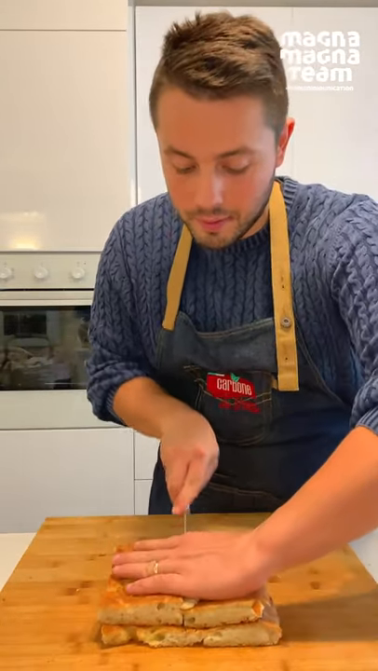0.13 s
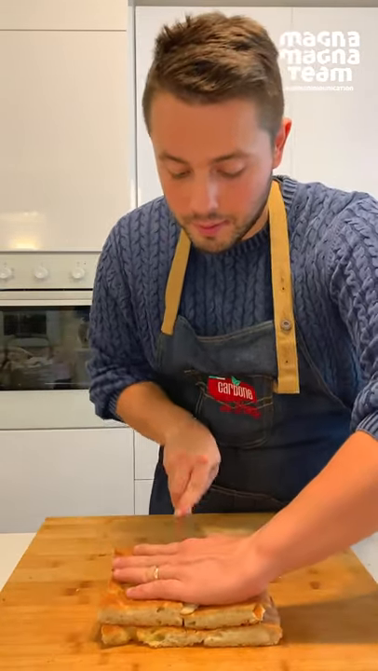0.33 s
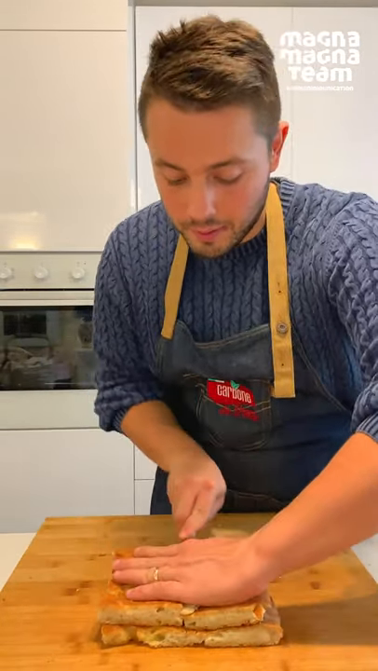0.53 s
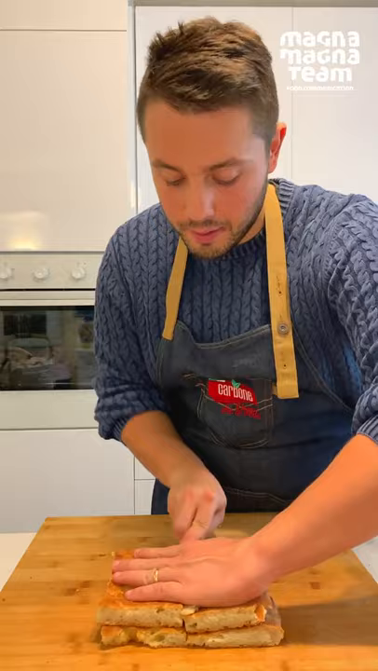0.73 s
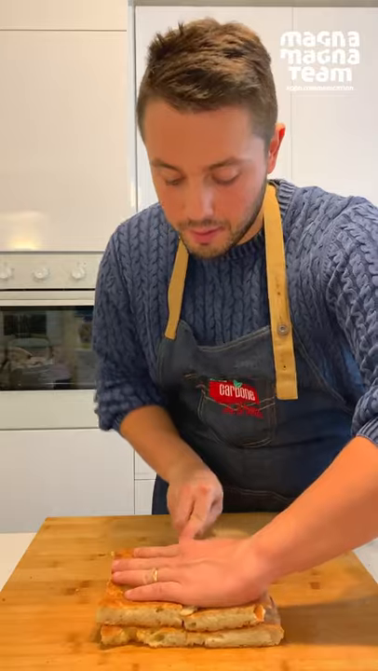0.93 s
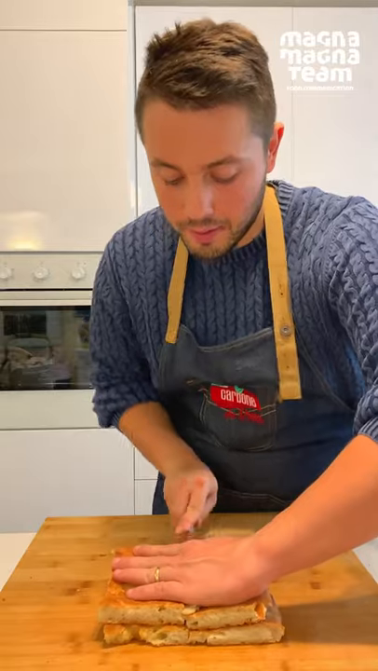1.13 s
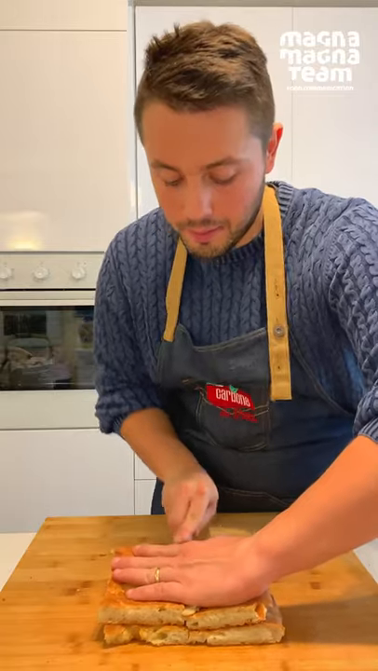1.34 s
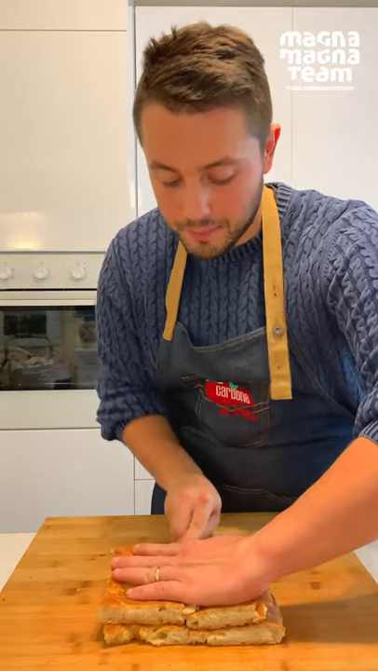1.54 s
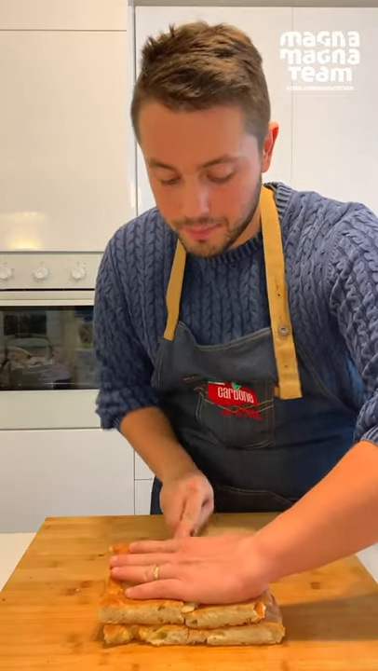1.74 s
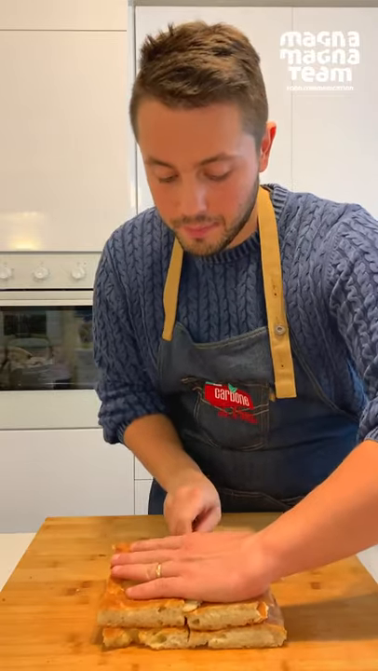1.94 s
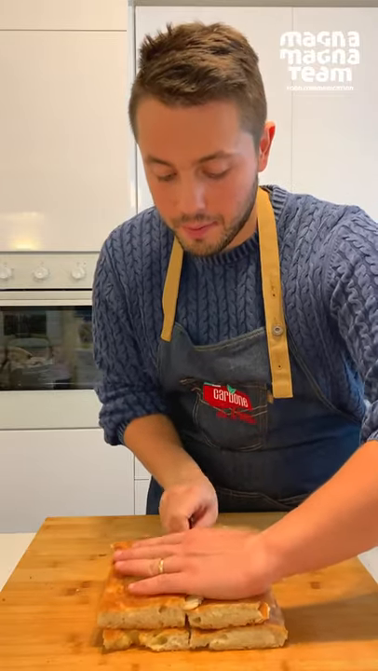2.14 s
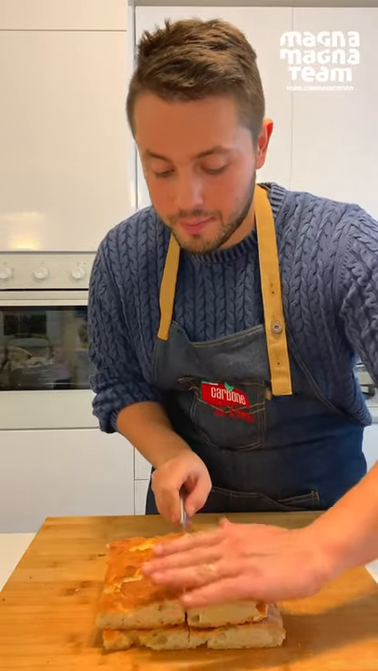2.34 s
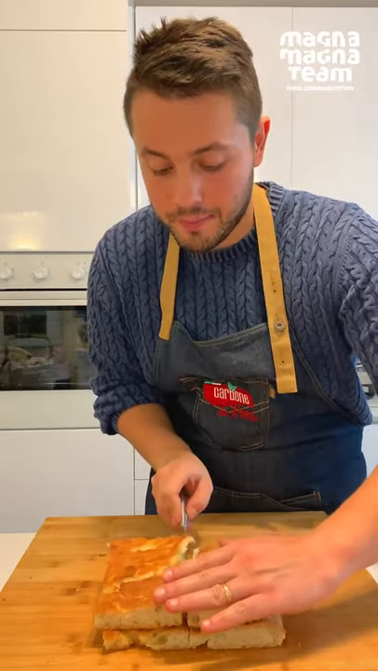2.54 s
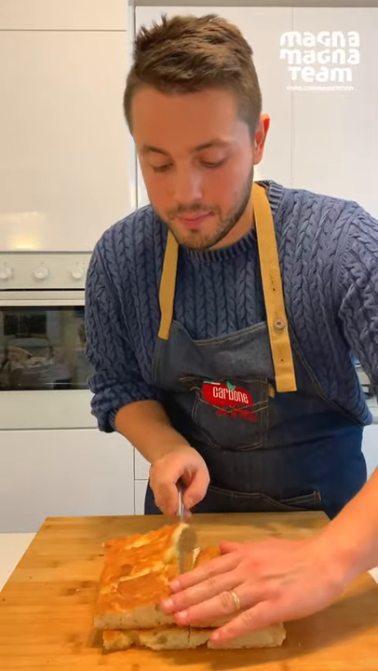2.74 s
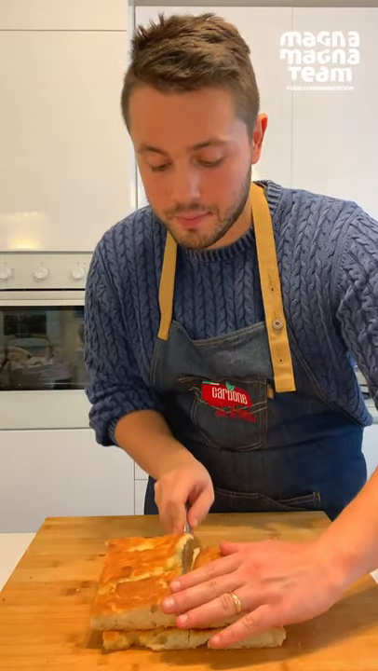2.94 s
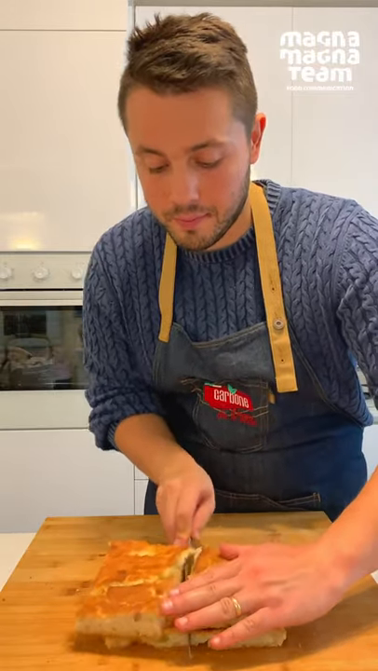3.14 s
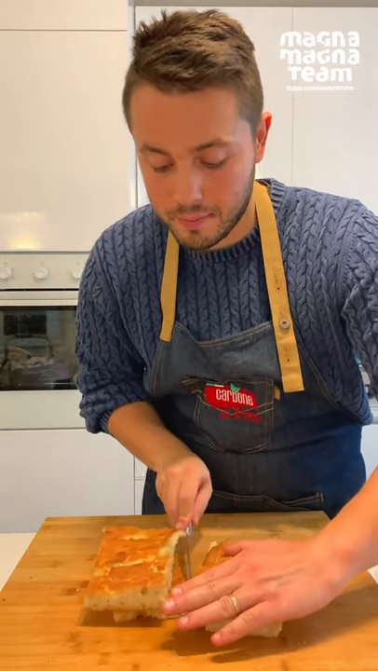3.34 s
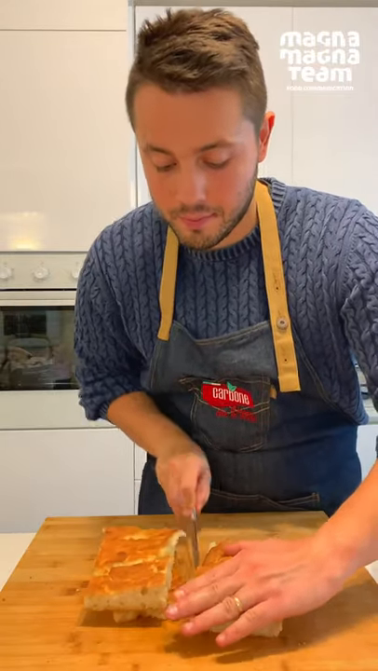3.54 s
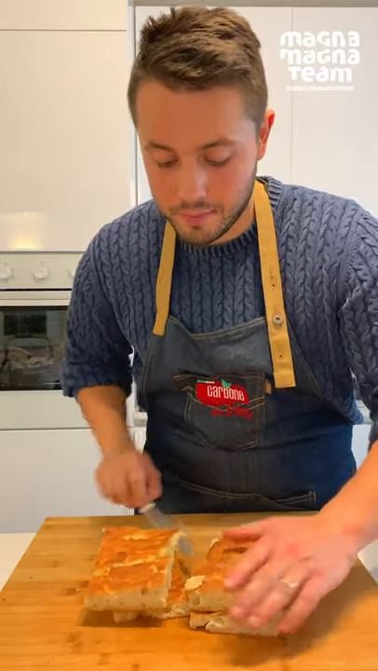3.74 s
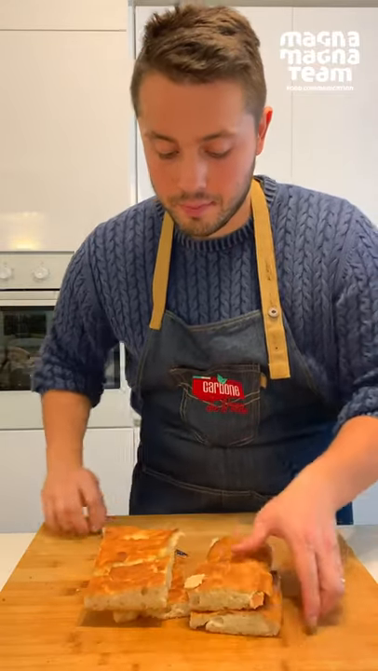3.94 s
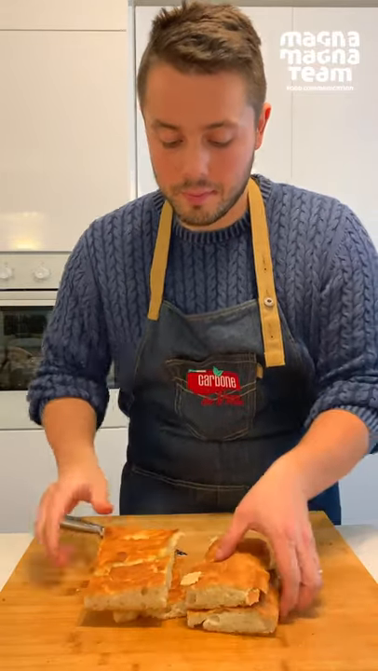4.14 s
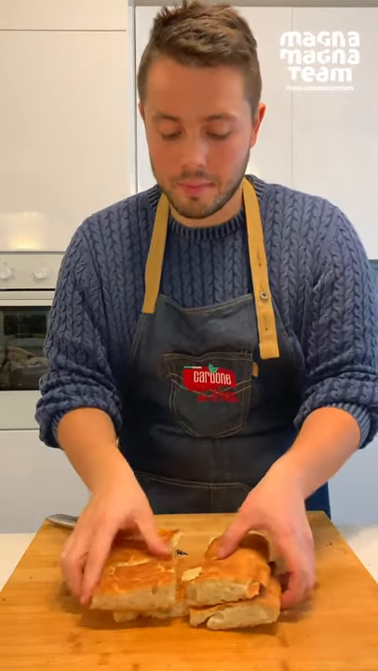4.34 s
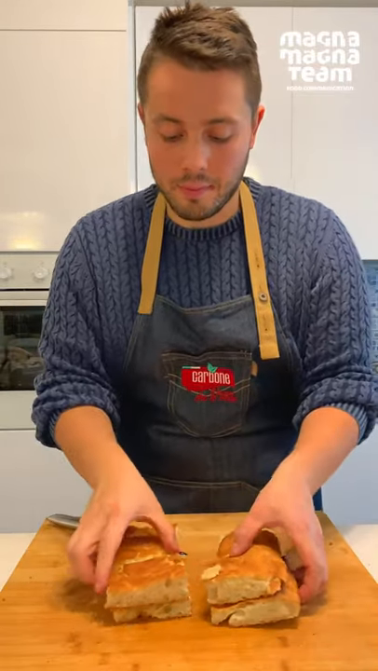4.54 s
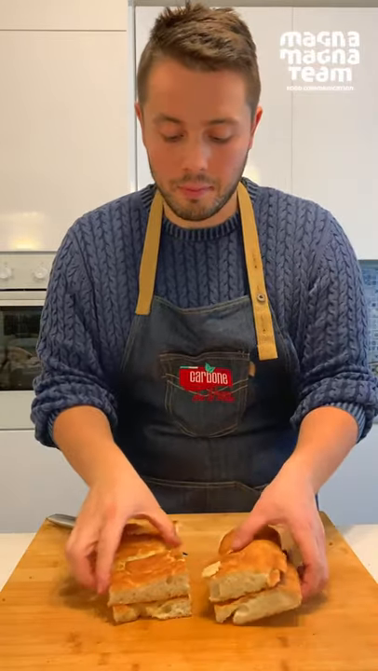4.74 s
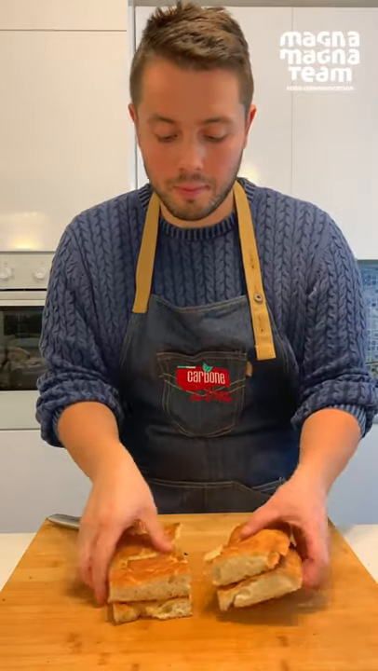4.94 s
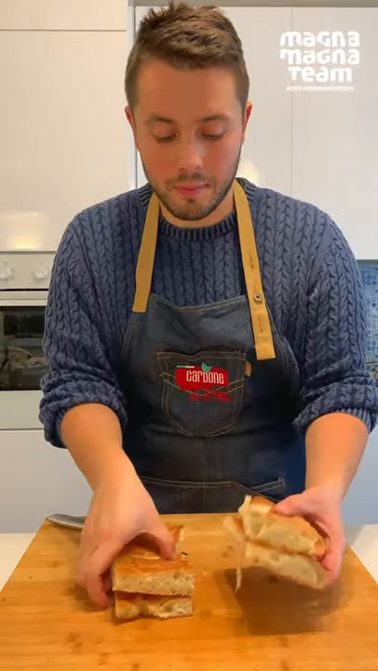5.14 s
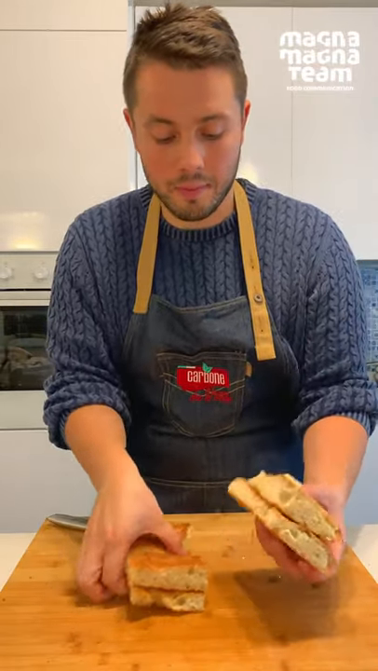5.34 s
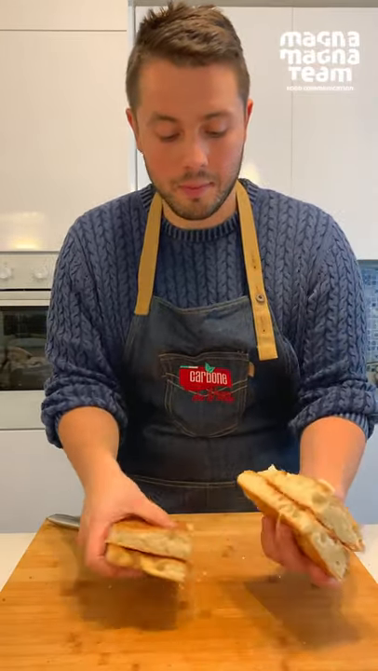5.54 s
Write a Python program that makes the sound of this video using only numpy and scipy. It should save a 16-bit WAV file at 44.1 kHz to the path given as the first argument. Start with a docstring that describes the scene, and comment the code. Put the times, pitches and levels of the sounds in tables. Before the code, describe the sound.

Close up in a kitchen, with a fan running softly, crisp bread crust crunches and crackles under a quickly sawing knife. The cutting pauses, then resumes with three slow strokes. The knife lands on the wooden board with a sharp knock and a brief metallic rattle, and dry crust rustles lightly as the pieces are lifted.

```python
"""Sawing crusty bread in a kitchen

A fan hums while a knife saws through a loaf on a wooden board: quick strokes, then three slow ones.
Each stroke breaks bits of crust that crackle, drum through loaf and board, and make the blade ring.
The blade clinks, then the knife drops on the board with a knock and rattles to rest.
Hands brush over the dry crust as they lift the pieces."""
import sys
import numpy as np
from scipy import signal
from scipy.fft import rfft, irfft
from scipy.io import wavfile

SR = 44100
rng = np.random.default_rng(int(sys.argv[2]) if len(sys.argv) > 2 else 0)


def store_wav(level_fs):
    """Save 16-bit WAV to argv[1]."""
    pcm = np.round(np.clip(np.atleast_2d(level_fs), -1, 1) * 32767)
    wavfile.write(sys.argv[1], SR, pcm.T.astype(np.int16))


N = 246078
TIME = np.arange(N) / SR
FREQS = np.maximum(np.arange(N // 2 + 1) * SR / N, 1)

# Levels in the tables are relative: each sound is turned up or down as a whole later.
# How alike left and right are for close sounds. Each row: pitch in Hz, likeness from 0 to 1.
NEAR_LIKENESS = [(100, 1), (600, 0.87), (1200, 1), (2600, 0.24), (5000, 0.11), (10000, 0.042)]
# The same for the fan and the room's echo. Each row: pitch in Hz, likeness from 0 to 1.
FAR_LIKENESS = [(60, 0.71), (130, 0.74), (270, 0.99), (580, 0.46), (1200, 0.16), (2600, 0.1), (5500, 0.046)]
# Weight leaning on the knife. Each row: time in seconds, level in dB.
LEANING = [(0, -50.5), (.5, -51.5), (1.05, -45.5), (1.5, -54), (1.8, -50), (2.15, -73), (2.45, -75)]
# The tone of something brushing the crust. Each row: pitch in Hz, level in dB.
BRUSH_TONE = [(600, -11.5), (1200, 11), (2200, 9), (3200, 4), (4700, 3), (5400, 5.5), (6500, 3),
              (8000, 0.5), (10500, -1), (12000, -28)]
# The knife hitting the board. Each row: time in seconds, board level in dB, blade level in dB,
# blade brightness in dB per octave, seconds a 1000 Hz wave travels in the board, chatter level in dB.
BLOWS = [(3.8115, -31, -41.5, 6, 0.0012, -62), (3.8367, -38, -32, -2, 0.00055, -29),
         (3.9055, -28, -56, 0.5, 0.00067, -53.5), (3.9325, -26, -37.5, -3, 0.00039, -51),
         (3.9424, 3.5, -42.5, 0, 0.0039, -37.5), (3.952, -19.5, -37, 11.5, 0.00112, -27.5),
         (3.9720, -32.5, -44, 7.5, 0.0016, -24.5), (3.9821, -5, -49.5, 14, .0007, -21),
         (3.9965, -28.5, -36.5, 11, .001, -28.5)]


def amp(db):
    """Turn decibels into a number to multiply by."""
    return 10 ** (np.asarray(db) / 20)


def unit(x, axis=None):
    """Scale a signal so that its average power is 1."""
    return x / np.sqrt(np.mean(np.abs(x) ** 2, axis=axis, keepdims=True) + 1e-20)


def level(rows):
    """Strength over time, from rows of seconds and dB."""
    return amp(np.interp(TIME, *np.transpose(rows)))


def at_hz(points, hz):
    """Read a table between its pitches, giving each octave equal room."""
    pitches, values = np.transpose(points)
    return np.interp(np.log(hz), np.log(pitches), values)


def response(tone):
    """Turn a tone table into a filter that rings only after it is struck (minimum phase)."""
    cepstrum = irfft(np.log(unit(amp(at_hz(tone, FREQS)))), N)
    cepstrum[1:N // 2] *= 2
    cepstrum[N // 2 + 1:] = 0
    return np.exp(rfft(cepstrum))


def colour(x, tone):
    """Filter a signal to give it the tone in a table."""
    return irfft(rfft(x) * response(tone), N)


def blend(pair, likeness):
    """Mix two unrelated signals into left and right, alike in the bass and apart in the treble."""
    alike = np.clip(at_hz(likeness, FREQS), 0, 1)
    mid, side = rfft(pair)
    return irfft(np.sqrt((1 + alike) / 2) * mid + np.sqrt((1 - alike) / 2) * side * [[1], [-1]], N)


def drift(per_s):
    """A line that wanders at random around zero."""
    points = rng.standard_normal(int(N / SR * per_s) + 2)
    return unit(np.interp(TIME * per_s, np.arange(len(points)), points))


def grains(per_s, spread_db):
    """Tiny random clicks of uneven size, each shared differently between two channels."""
    clicks = rng.random(N) < per_s / SR
    size = amp(spread_db * np.minimum(rng.exponential(1, N), 4))
    angle = rng.uniform(0, 2 * np.pi, N)
    return unit(clicks * size * np.array([np.cos(angle), np.sin(angle)]))


def swell(start, end, skew=0.82, sharpness=1.6):
    """The force of one hand movement, from 0 to 1: it grows quickly and eases off."""
    progress = np.clip((TIME - start) / (end - start), 0, 1)
    return np.abs(np.sin(np.pi * progress ** skew)) ** sharpness


def held(start_s, rise_s, length_s, fade_s):
    """Rise, hold until the length is over, then die away."""
    rise = np.clip((TIME - start_s) / rise_s, 0, 1)
    return rise * np.exp(-np.clip((TIME - start_s - length_s) / fade_s, 0, 40))


def fan():
    """A fan makes a steady rush of air and a low hum."""
    # The tone of the moving air. Each row: pitch in Hz, level in dB.
    air_tone = [(25, -27), (45, -7), (65, -13.5), (95, -17), (125, -4.5), (180, -1.5), (245, -5.5),
                (360, -0.5), (520, -3.5), (700, -7), (900, -3.5), (1200, -11.5), (2100, -18.5),
                (3000, -50.5), (10500, -51), (12000, -68)]
    # The notes of the hum. Each row: pitch in Hz, level in dB.
    hum_notes = [(61.5, -69), (100.2, -61.5)]
    air = blend(colour(rng.standard_normal((2, N)), air_tone), FAR_LIKENESS)
    hum = sum(amp(db) * np.sqrt(2) * np.sin(2 * np.pi * (hz * TIME + rng.random()))
              for hz, db in hum_notes)
    return amp(-54.1) * air + hum


def sawing():
    """The edge catches and slips: big breaks drum through the loaf, fine ones crackle and ring steel."""
    # Saw strokes. Each row: start in seconds, end in seconds, rasp level in dB, crackle level in dB.
    strokes = [(0.101, 0.203, -43.5, -49.5), (0.272, 0.339, -41.5, -49), (0.393, 0.484, -39.5, -43.5),
               (0.535, 0.612, -39, -51), (0.627, 0.754, -39, -49), (0.767, 0.881, -30, -50),
               (0.878, 0.994, -32, -45.5), (1.023, 1.163, -35.5, -53), (1.16, 1.291, -42.5, -53),
               (1.302, 1.421, -34.5, -42), (1.4, 1.525, -33, -41.5), (1.527, 1.672, -35.5, -43),
               (1.633, 1.84, -42.5, -52.5), (2.951, 3.084, -50, -65), (3.051, 3.387, -43, -50.5),
               (3.408, 3.579, -44, -54)]
    # The tone of coarse crust breaking. Each row: pitch in Hz, level in dB.
    rasp_tone = [(60, -28.5), (150, -24.5), (250, -6.5), (350, -0.5), (500, 7), (750, 1), (1100, 3),
                 (1400, -9.5), (1700, -4), (2200, -15.5), (2900, -47), (4500, -42)]
    # The tone of fine crust breaking. Each row: pitch in Hz, level in dB.
    crackle_tone = [(500, 5.5), (1200, 1.5), (1900, -0.5), (2500, 21.5), (3100, -25), (4100, 9), (4750, 5),
                    (5400, 8.5), (6400, 15), (7600, 11), (8850, 17), (9700, 14), (10600, 5.5),
                    (12000, -49.5)]
    # The low tone of the loaf rocking. Each row: pitch in Hz, level in dB.
    rumble_tone = [(20, -32.5), (45, -4), (70, 2), (112, 1), (150, -6.5), (220, 1), (400, -8),
                   (1000, -50.5)]
    rasp, crackle = sum(amp([[rasp_db], [crackle_db]]) * swell(start, end)
                        for start, end, rasp_db, crackle_db in strokes)
    catching = unit(amp(1.3 * drift(per_s=220)))
    lean = level(LEANING)
    drag = catching * np.hypot(rasp, amp(-7.5) * lean)  # the weight keeps it grinding between strokes
    coarse = grains(per_s=900, spread_db=2) * drag
    fine = grains(per_s=6000, spread_db=1.5) * catching * crackle
    crunch = amp(-4) * colour(coarse, rasp_tone)
    hollow = amp(15) * loaf(grains(per_s=1800, spread_db=1.2) * drag)
    scrape = amp(6.5) * teeth(fine)
    crisp = amp(2) * colour(fine, crackle_tone)
    push = lean + amp(-23.5) * rasp + amp(1) * touch_force()
    rocking = amp(-6.5) * colour(grains(per_s=130, spread_db=4) * push, rumble_tone)
    return blend(crunch + hollow + crisp + scrape + rocking, NEAR_LIKENESS)


def resonance(x, hz, width):
    """Let a signal ring at one pitch; a smaller width in Hz rings longer."""
    r = np.exp(-np.pi * width / SR)
    feed = np.array([1, 0, -1]) * (1 - r * r) / 2
    feedback = [1, -2 * r * np.cos(2 * np.pi * hz / SR), r * r]
    return signal.lfilter(feed, feedback, x + 1e-18)


def loaf(breaks):
    """Loaf and board ring with a hollow sound that changes as the blade sinks in."""
    # How far the blade is in the loaf. Each row: time in seconds, depth from 0 to 1.
    blade_depth = [(0, 0), (1.2, .05), (1.36, .8), (3.1, 1)]
    # The notes of loaf, board and wedged blade. Each row: pitch in Hz, width in Hz,
    # level in dB with the blade at the surface, level in dB with it deep in the cut.
    notes = [(121.5, 11, 0.5, -10), (164, 26, -6, -12), (239.5, 9.7, 1, 0.5), (342, 17, 3, -17),
             (411.6, 20, -8, 4), (519.4, 30, 3.5, 1), (559.4, 60, -7, 0), (665.4, 33, 9.5, -1.5),
             (759, 47, 3, -1), (893, 130, -1, -7), (1004, 80, -7.5, 5), (1215, 58, -2, -20.5),
             (1387, 90, -14, -6), (1665, 320, -19, -8.5), (1953, 73, -32.5, -3), (2530, 160, -22.5, -20.5)]
    depth = np.interp(TIME, *np.transpose(blade_depth))
    # The soft inside of the loaf swallows the treble.
    muffled = signal.sosfilt(signal.butter(2, 2840, fs=SR, output="sos"), breaks + 1e-18)
    surface, deep = muffled * (1 - depth), muffled * depth
    return sum(resonance(surface * amp(top_db) + deep * amp(deep_db), hz, width)
               for hz, width, top_db, deep_db in notes)


def teeth(friction):
    """The blade gives a thin ring as its teeth scrape."""
    # The notes of the scraped blade. Each row: pitch in Hz, width in Hz, level in dB.
    notes = [(3580, 90, -6), (4380, 150, -1), (5040, 160, 1), (5500, 200, -3), (6450, 350, 1),
             (7050, 200, -1), (8520, 220, 0), (9340, 400, -2)]
    return sum(resonance(friction, hz, width) * amp(db) for hz, width, db in notes)


def touch_force():
    """How hard the hands touch the bread over time."""
    # Hands brushing and lifting. Each row: start in seconds, end in seconds, level in dB.
    touches = [(2.122, 2.203, -72), (2.206, 2.33, -75), (3.56, 3.704, -72.5), (4.47, 4.58, -70),
               (4.851, 4.975, -72.5), (5.04, 5.157, -76), (5.184, 5.33, -65.5), (5.347, 5.48, -66.5),
               (5.466, 5.575, -68)]
    return sum(amp(db) * swell(start, end) for start, end, db in touches)


def handling(grasp_s=3.8):
    """Dry crust rustles as it is leaned on, brushed by fingers and finally held."""
    force = touch_force() + amp(-6.5) * level(LEANING) + amp(-78.5) * (TIME > grasp_s)
    rustle = grains(per_s=2500, spread_db=2.2) * force
    return amp(3) * blend(colour(rustle, BRUSH_TONE), NEAR_LIKENESS)


def snaps_and_knocks(spray_s=0.0058, spray_db=-19.5):
    """Crust snaps, or bread or blade knocks: each is one click and a short spray of tiny ones."""
    # Crust snaps, plus a few soft knocks and thuds of bread and blade.
    # Each row: time in seconds, level in dB.
    hits = [(0.0835, -31), (0.1336, -44), (0.1765, -16.5), (0.2915, -22.5), (0.411, -23), (0.644, -29),
            (0.711, -21.5), (0.782, -21), (0.8955, -12), (1.5955, -17), (2.182, -38.5), (2.25, -36.5),
            (3.0295, -23.5), (3.0395, -43), (5.263, -27)]
    # The tone they all share. Each row: pitch in Hz, level in dB.
    hit_tone = [(100, -54.5), (400, -17), (800, 18), (1500, 8.5), (2300, 2), (3300, -8.5), (6500, -6),
                (11000, -18.5)]
    clicks, spray_level = np.zeros(N), np.zeros(N)
    for start, db in hits:
        at = round(start * SR)
        clicks[at] = amp(db)
        spray_level[at:] += amp(db + spray_db) * np.exp(-TIME[:N - at] / spray_s)
    spray = blend(spray_level * grains(per_s=4000, spread_db=1), NEAR_LIKENESS)
    return amp(5) * colour(clicks + spray, hit_tone)


def sliding():
    """The flat of the blade slides along the cut bread with a thin scrape."""
    # Slides in or out of the cut. Each row: start in seconds, length in seconds, level in dB.
    slides = [(1.885, 0.017, -47.5), (2.196, 0.056, -67.5), (2.909, 0.072, -58), (3.685, 0.063, -68.5),
              (3.748, 0.15, -57.5)]
    force = sum(amp(db) * held(start, rise_s=0.049, length_s=length, fade_s=0.025)
                for start, length, db in slides)
    friction = grains(per_s=6000, spread_db=1.5) * force
    return blend(amp(7) * teeth(friction) + colour(friction, BRUSH_TONE), NEAR_LIKENESS)


def board():
    """Each blow bends the board, and waves cross it with the highs ahead of the lows."""
    # The tone of knocked wood. Each row: pitch in Hz, level in dB.
    knock_tone = [(50, -29.5), (150, -4.5), (330, -3.5), (480, 2), (700, -17.5), (1000, 0), (1500, 9),
                  (2000, 6), (2700, 2.5), (3600, -22.5), (6000, -18.5), (11000, -43.5)]
    spectrum = 0
    for start, board_db, _, _, travel_s, _ in BLOWS:
        lag_cycles = FREQS * start + 2 * travel_s * np.sqrt(FREQS * 1000)
        spectrum = spectrum + amp(board_db) * np.exp(-2j * np.pi * lag_cycles)
    return amp(6.5) * irfft(spectrum * response(knock_tone), N) * np.ones((2, 1))


def blade(let_go_s=3.94, rest_s=4.25, rest_fade_s=0.13, notes_per_group=8):
    """Every blow rings the steel, a little differently; a flat landing favours the high notes."""
    # Groups of close notes in the steel. Each row: pitch in Hz, spread in Hz, level in dB when free,
    # level in dB when held, seconds the free blade takes to fade by 60 dB.
    note_groups = [(1653, 25, -16.5, -9.5, 0.081), (1970, 22, -10, -1, 0.19),
                   (2570, 50, -6.5, -10.5, 0.092), (3070, 35, -5, -1.5, 0.27), (3560, 28, -7, 1, 0.44),
                   (4295, 40, -6.5, -7.5, 0.55), (5040, 90, -6.5, -9, 0.94), (5800, 210, -13.5, -3.5, 0.2),
                   (5940, 70, -3.5, -11, 0.32), (6977, 1.88, -10.5, -22.5, 0.55),
                   (7600, 160, -11.5, -12.5, 0.46), (8310, 29, -5.5, -9.5, 0.42), (8480, 8, -13, -19, 0.51),
                   (8753, 59, -4, -17.5, 0.2), (9300, 2.6, -14, -8, 0.36), (10680, 250, -14, -12, 0.23)]
    rings = np.zeros((2, N))
    t = TIME[:SR]  # each ring lasts at most a second
    for start, _, blade_db, brightness, _, _ in BLOWS:
        at = round(start * SR)
        in_hand = start < let_go_s
        damping = 1.5 if in_hand else 1  # the hand shortens the ring
        for hz, spread, free_db, hand_db, ring_s in note_groups:
            note_db = hand_db if in_hand else free_db
            offsets_hz = spread * rng.uniform(-np.sqrt(3), np.sqrt(3), (notes_per_group, 1))
            phases = np.exp(2j * np.pi * rng.random((2, notes_per_group)))
            # Close notes waver against each other, slowly enough to work out every 20th sample.
            wavering = unit(phases @ np.exp(2j * np.pi * offsets_hz * t[::20]), axis=1)
            fading_note = np.exp((2j * np.pi * hz - np.log(1000) * damping / ring_s) * t)
            ring = np.repeat(wavering, 20, axis=1)[:, :SR] * fading_note
            octaves = np.log2(hz / 4000)
            rings[:, at:at + SR] += amp(blade_db + note_db + brightness * octaves) * ring.imag
    # Once the blade lies flat, the wood stops its ring.
    resting = np.exp(-np.maximum(TIME - rest_s, 0) / rest_fade_s)
    return amp(-5.5) * rings * resting


def settling(counter_hz=60):
    """The knife chatters on the wood after each blow, then wobbles to rest while the counter booms."""
    # The tone of steel rattling on wood. Each row: pitch in Hz, level in dB.
    rattle_tone = [(150, -15), (400, -8), (900, -7.5), (1600, -1.5), (2500, -6.5), (3500, -21), (5350, -14),
                   (5950, 7), (6450, -5.5), (7000, -7), (7600, -10.5), (8600, -2.5), (10500, -10.5),
                   (12000, -19.5)]
    # The tone of the counter's thud. Each row: pitch in Hz, level in dB.
    thud_tone = [(20, -32.5), (45, -15.5), (62, 9), (85, 1), (130, -19.5), (300, -44.5)]
    wobble = held(start_s=3.97, rise_s=0.06, length_s=0.18, fade_s=0.044)
    buzz = amp(-45.5) * wobble  # the wobbling knife keeps tapping the wood
    contacts = np.zeros(N)
    for start, *_, chatter_db in BLOWS:
        contacts[round(start * SR)] = amp(chatter_db + 18.5)  # the first touch is the hardest
        buzz += amp(chatter_db) * held(start, rise_s=1 / SR, length_s=0, fade_s=0.0063)
    chatter = colour(grains(per_s=4000, spread_db=1.5) * buzz, rattle_tone)
    ticks = signal.sosfilt(signal.butter(2, 6800, fs=SR, output="sos"), colour(contacts, rattle_tone))
    thud = amp(-55) * colour(rng.standard_normal((2, N)), thud_tone)
    boom = amp(-49.5) * np.sqrt(2) * np.sin(2 * np.pi * counter_hz * TIME)
    return blend(chatter + thud * wobble, NEAR_LIKENESS) + boom * wobble + ticks


def kitchen(x, build_s=0.0017):
    """Many small echoes build up, then die away at a speed that depends on pitch."""
    # How long the room rings. Each row: pitch in Hz, seconds to fade by 60 dB.
    ring_times = [(100, .5), (500, .5), (1700, .62), (5000, .52), (8000, .46), (11000, .38)]
    noise = rfft(rng.standard_normal((2, N)))
    edges_hz = np.geomspace(40, 13000, 9)
    tail = 0
    for low, high in zip(edges_hz, edges_hz[1:]):
        band = irfft(noise * ((FREQS >= low) & (FREQS < high)), N)
        ring_s = at_hz(ring_times, np.sqrt(low * high))
        tail = tail + band * amp(-60 * np.minimum(TIME / ring_s, 3))
    build_up = 1 - np.exp(-(TIME / build_s) ** 2)
    tail = blend(tail * build_up, FAR_LIKENESS)[:, :SR]
    return signal.fftconvolve(x, unit(tail) / np.sqrt(2 * SR), axes=1)[:, :N]


def scene():
    """Bread, knife and fan in the kitchen; the knife's handle lands to the right."""
    # The balance of the two sides. Each row: pitch in Hz, left level minus right level in dB.
    balance = [(60, -1), (190, -3.5), (350, -6), (630, -5.5), (1130, -2), (3000, -2), (6500, 0.4)]
    bread = sawing() + sliding() + handling() + snaps_and_knocks()
    knock = board()
    steel = blade() + settling()
    room = kitchen(amp(-5.5) * bread + amp(-9) * knock + amp(-1) * steel)
    sound = bread + knock * amp([[-0.89], [0.89]]) + steel + room + fan()
    side_gains = amp(at_hz(balance, FREQS) * [[0.5], [-0.5]])
    return irfft(rfft(sound) * side_gains, N)


def record(dry):
    """Cut away the treble above 11600 Hz steeply."""
    return signal.sosfilt(signal.ellip(10, 0.3, 80, 11600, fs=SR, output="sos"), dry)


dry = scene()
out = record(dry)
store_wav(out)
```